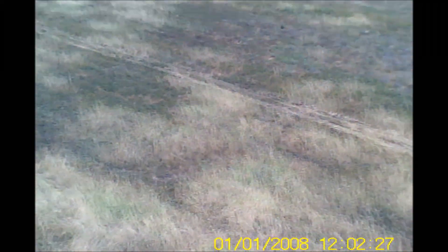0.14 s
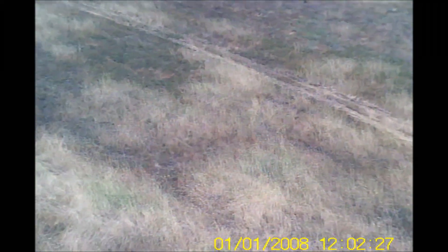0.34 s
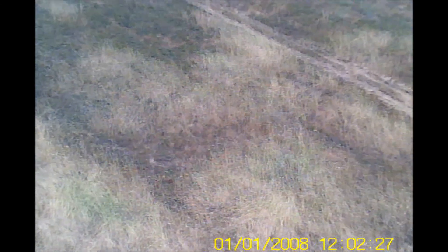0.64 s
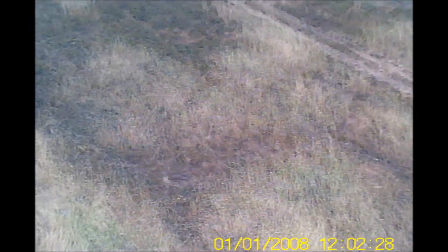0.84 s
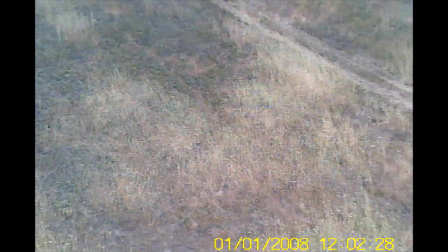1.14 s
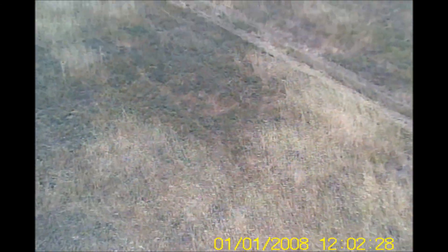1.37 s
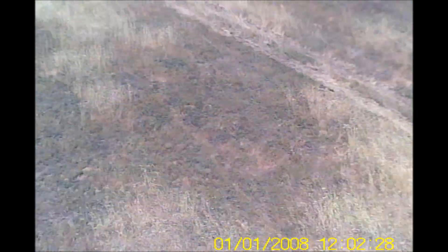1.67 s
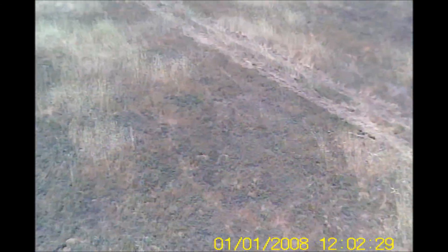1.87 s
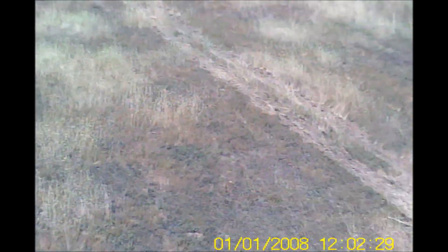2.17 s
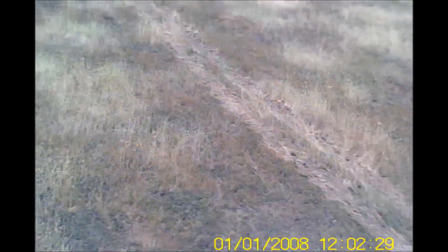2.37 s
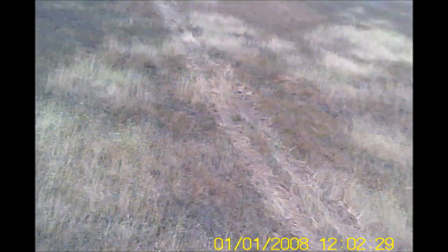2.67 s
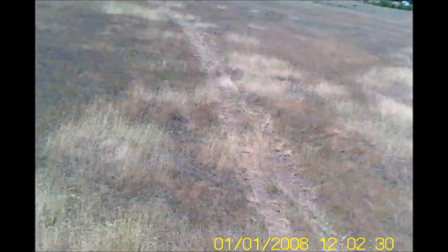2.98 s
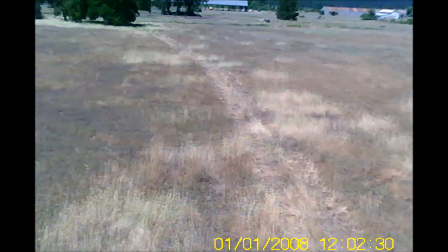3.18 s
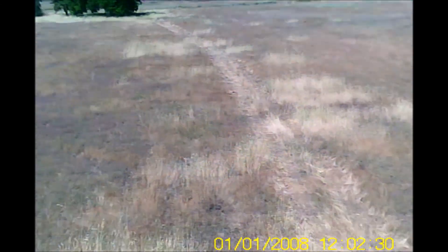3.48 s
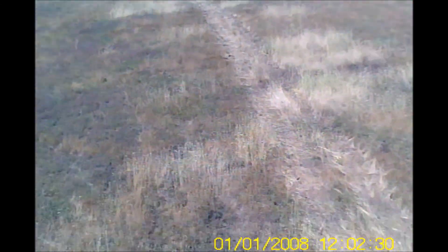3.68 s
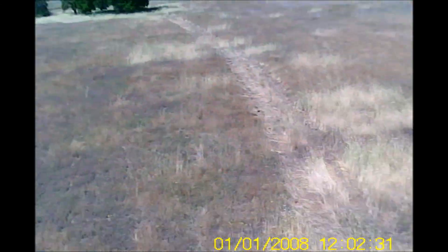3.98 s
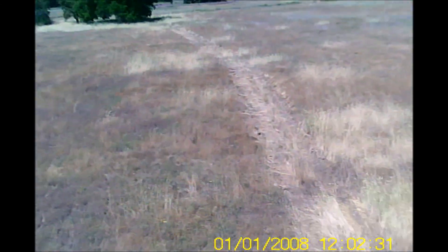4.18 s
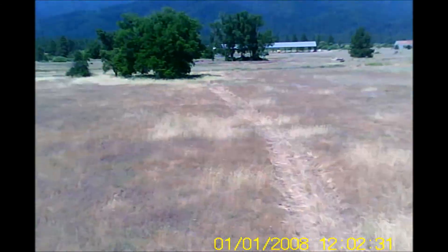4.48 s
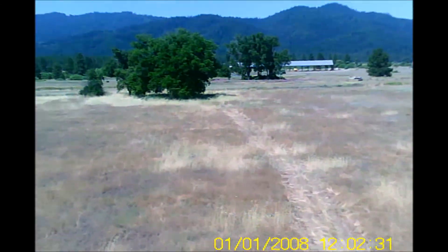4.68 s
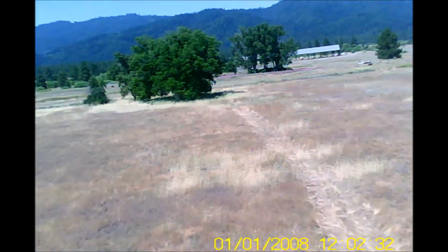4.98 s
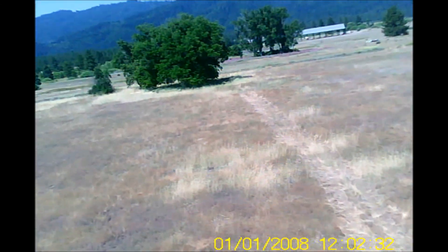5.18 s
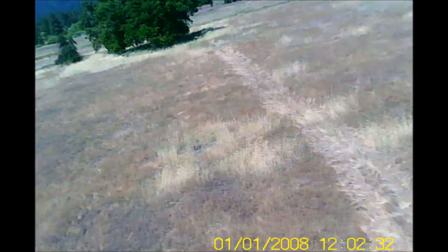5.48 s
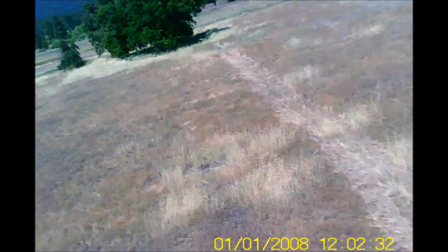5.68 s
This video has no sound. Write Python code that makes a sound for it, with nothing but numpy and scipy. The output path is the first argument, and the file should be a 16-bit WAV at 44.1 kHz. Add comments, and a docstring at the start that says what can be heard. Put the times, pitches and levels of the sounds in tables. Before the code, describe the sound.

Close, mono, slightly dull onboard sound outdoors, dry and without echo. The steady fluttering drone of a toy-sized helicopter rotor runs throughout, wavering only slightly in pitch, with thin gear lines and pulsing hiss. Wind rushes unevenly, brighter from about one second with sliding, throbbing whistles. Later it turns rougher, with low thuds, short puffs and brief whistling, then becomes a little quieter but still gusty to the cut-off.

```python
"""A microphone rides on a small electric model helicopter flying low over a field.
From the start two blades thump past at twice the rotor speed, over motor and gear lines locked to the rotor,
gear hiss and lumpy, rushing wind. Puffs and short whistles open; longer whistles glide from 1 s to 1.9 s.
From 3.5 s gusts thump and puff at the microphone port and whistles return; near 4.45 s the level steps down.
A last whistle comes at 5.5 s. Pulses and lines are cosines of rotor angle; air and hiss are shaped noise."""
import sys
import numpy as np
from scipy import signal
from scipy.fft import rfft, irfft, next_fast_len
from scipy.io import wavfile
from scipy.ndimage import uniform_filter1d

SR = 44100
rng = np.random.default_rng(int(sys.argv[2]) if len(sys.argv) > 2 else 0)


def transcribe(signal):
    """Save signal, clipped to [-1, 1], as a 16-bit WAV file at the path in sys.argv[1]."""
    frames = np.atleast_2d(signal).T
    limited = np.clip(frames, -1, 1)
    pcm = np.round(limited * 32767).astype(np.int16)
    wavfile.write(sys.argv[1], SR, pcm)


N = 257086


def from_db(db):
    """Amplitude ratio of a level in dB."""
    return 10 ** (np.asarray(db) / 20)


def rms_one(x):
    """Scale to rms 1."""
    return x / np.sqrt(np.mean(x ** 2) + 1e-20)


def in_time(rows):
    """Every column after the first, interpolated to one value per sample."""
    time_s, *columns = np.transpose(rows)
    return [np.interp(np.arange(N) / SR, time_s, column) for column in columns]


def at_hz(points, hz):
    """Spectrum level in dB, interpolated over log frequency."""
    points_hz, points_db = np.transpose(points)
    return np.interp(np.log(hz), np.log(points_hz), points_db)


def drift(rate_hz):
    """Noise at every 40th sample through a double one-pole low-pass, run in; spread 1."""
    r = np.exp(-2 * np.pi * rate_hz * 40 / SR)
    white = rng.standard_normal(N // 40 + 2002)
    slow = signal.lfilter([1], [1, -2 * r, r * r], white)[2000:]
    return np.interp(np.arange(N) / 40, np.arange(len(slow)), rms_one(slow))


def flicker(rate_hz):
    """The quick part of a drift, its 1/16 s running mean removed; spread 1."""
    slow = drift(rate_hz)
    return rms_one(slow - uniform_filter1d(slow, size=SR // 16))


def coloured(spectrum):
    """Steady noise of a given spectrum; rms 1."""
    size = next_fast_len(N)
    hz = np.maximum(np.arange(size // 2 + 1) * SR / size, 1)
    shaped = rfft(rng.standard_normal(size)) * from_db(at_hz(spectrum, hz))
    return rms_one(irfft(shaped, size)[:N])


# rotor speed: (time [s], speed [turns/s])
ROTOR_SPEED = [(0.0, 50.61), (0.2, 50.78), (1.0, 51.02), (2.0, 50.31), (2.4, 49.96), (2.75, 49.80),
               (3.2, 49.90), (3.8, 50.15), (4.0, 50.31), (4.4, 49.88), (4.8, 49.62), (5.05, 49.76),
               (5.6, 50.6), (5.83, 50.65)]


def rotor_turns():
    """Rotor angle in turns: the running sum of its speed."""
    start_turns = 0.22
    return np.cumsum(in_time(ROTOR_SPEED)[0]) / SR + start_turns


# blade pressure pulse: (time [s], blade-rate level [dB], step per overtone [dB], once-a-turn imbalance [dB])
BLADE_PULSE = [(0.0, -40, -10, -18), (0.37, -37.5, -11.5, -19), (0.5, -41.5, -10, -3),
               (0.62, -39.5, -11.5, -20), (0.8, -40.5, -11.5, -30), (1.05, -38, -10.5, -11),
               (1.91, -36.5, -8.5, -8), (2.18, -34.5, -8, -14), (2.9, -33, -8, -15), (3.02, -37, -8.5, -13),
               (3.52, -36, -7, -13), (3.64, -42, -7, -25), (3.78, -41.5, -6.5, -8), (3.87, -38, -8, -2),
               (4.12, -36, -7, -6), (4.22, -34.5, -6.5, -10), (4.44, -32.5, -8.5, -3),
               (4.53, -36.5, -6, -15), (4.64, -30.5, -10, -16), (4.85, -37.5, -6.5, -11),
               (5.24, -38, -8, -3), (5.36, -43, -7.5, -11), (5.55, -44.5, -6.5, -6), (5.68, -41.5, -10, -6),
               (5.83, -35, -14, -16)]
PULSE_SKEW_RAD = 0.47   # leans each pulse


def blades(turns):
    """A peaked pulse per blade; rougher air shakes its timing and each overtone's strength more."""
    level_db, step_db, imbalance_db = in_time(BLADE_PULSE)
    buffet_db = in_time(WIND_AT_PORT)[0]
    rough = np.clip(from_db(1.1 * (buffet_db - level_db + 12.0)), .5, 3)
    angle = 2 * np.pi * (turns + 0.0049 * np.sqrt(rough) * drift(37))
    pulses = 0
    for k, extra_db in enumerate([1, 0, 2, -4.0, -3.5]):
        sharpness_db = k * (step_db + 0.78 * drift(3.7))
        gain = from_db(sharpness_db + extra_db + 0.71 * rough * drift(16.2))
        pulses = pulses + gain * np.cos(2 * (k + 1) * angle - k * PULSE_SKEW_RAD)
    # one blade bites harder: strong and weak pulses alternate
    imbalance = from_db(imbalance_db) * (np.cos(angle + 0.088) + 0.49 * np.cos(3 * angle - .1))
    return np.sqrt(2) * from_db(level_db) * (pulses + imbalance)


def around_turn(swells, turns):
    """Gain from gear run-out: one swell once a turn, one twice a turn."""
    gain_db = 0
    for k, (depth_db, at_turns) in enumerate(swells):
        gain_db = gain_db + depth_db * np.cos(2 * np.pi * (k + 1) * (turns - at_turns))
    return from_db(gain_db)


# motor shaft 12.5, tail drive 105, main gear 150 teeth: (multiple of rotor speed [-], level [dB rms])
GEAR_LINES = [(12.5, -66.9), (13.5, -76.2), (25, -74.9), (38.5, -78.8), (75, -71.6), (100, -80.8),
              (104, -80.6), (105, -71.3), (106, -75.0), (107, -73.6), (108, -78.2), (112.5, -82.9),
              (113.5, -85.5), (123, -98.7), (124, -81.5), (125, -78.2), (126, -86.4), (128, -89.4),
              (135.5, -85.8), (136.5, -79.4), (137.5, -76.8), (143, -83.2), (149, -81.7), (150, -69.3),
              (151, -76.7), (152, -72.5), (153, -77.3), (154, -78.5), (157, -78.3), (162.5, -76.6)]
# hiss of the meshing teeth through the frame: (frequency [Hz], density [dB per Hz])
TOOTH_HISS = [(450, -16), (800, -15), (1700, -9), (3600, -8), (4500, -7), (5300, -0.5), (6000, -12.5),
              (6700, -10.5), (7700, -2.5), (8500, -4.5), (9300, -10.5), (10400, -8), (11400, -8.5)]
# run-out swells above and below the split, rows once and twice a turn: (depth [dB], angle [turns])
UPPER_SWELLS = [(1.76, 0.73), (1.92, .005)]
LOWER_SWELLS = [(1.5, 0.037), (1, 0.093)]
HISS_DB, HISS_SPLIT_HZ = -55, 6200
PEAK_OVER_RMS_DB = 3


def drive_train(turns):
    """Motor and gear lines in step, neighbours beating once a turn, over hiss that swells with run-out."""
    gear_turns = turns - .05 + 0.00038 * drift(6.4)   # lags and wavers
    lines = 0
    for multiple, level_db in GEAR_LINES:
        loose_rad = 0.74 * drift(4.6)
        gain = from_db(level_db + 1.3 * drift(2.4) + 0.85 * drift(25))
        lines = lines + gain * np.cos(2 * np.pi * multiple * gear_turns + loose_rad)
    hiss = coloured(TOOTH_HISS)
    lower = signal.sosfiltfilt(signal.butter(4, HISS_SPLIT_HZ, fs=SR, output="sos"), hiss)
    upper = hiss - lower
    hiss = lower * around_turn(LOWER_SWELLS, turns) + upper * around_turn(UPPER_SWELLS, turns)
    return from_db(HISS_DB + 0.64 * flicker(79)) * hiss + from_db(PEAK_OVER_RMS_DB) * lines


# wind at the port: (time [s], buffeting [dB], rush [dB], brightness [dB per octave])
WIND_AT_PORT = [(0.0, -52, -56, -8), (0.06, -47, -58, 6), (0.13, -48, -65, 7.5), (0.17, -48.5, -60, -1),
                (0.9, -48, -61, -1), (1.2, -49, -54.5, 4.5), (1.38, -49.5, -49.5, 3.5),
                (1.7, -48.5, -51, 3.5), (2.25, -47, -51, 2.5), (2.74, -46, -54, 2), (2.86, -45, -50, 2.5),
                (2.96, -48, -51, 1.5), (3.03, -46, -54, 1.5), (3.5, -46, -52, 0), (3.57, -44, -47, -0.5),
                (3.68, -38.5, -49, 4.5), (3.87, -38, -47, -1), (4.2, -42.5, -50, 0), (4.5, -38, -51, -2),
                (5.0, -38, -49, -3.5), (5.15, -43.5, -50, -3), (5.31, -34, -48, 0), (5.56, -42.5, -50, 0),
                (5.83, -39.5, -50.5, -1)]
# spectra: (frequency [Hz], density [dB per Hz])
BUFFET_SPECTRUM = [(18, -6), (28, 0.5), (40, -16), (58, -6), (80, -8), (140, -16.5), (260, -19.5),
                   (450, -27.5), (800, -54.5)]
RUSH_SPECTRUM = [(150, 5), (350, 3), (700, 1), (1300, -3), (2200, -9), (3500, -17.5), (5000, -23.5),
                 (8000, -51)]
GUST_SPREAD_DB, GUST_RATE_HZ = 2.5, 4.2   # slow lumps in the buffeting
FLICKER_DB_PER_DB = 0.38   # flicker depth rises 0.38 dB per dB of buffeting


def wind(turns):
    """Lumpy low buffeting; a rush in half-octave bands that flicker partly together, throbbing with downwash."""
    buffet_db, rush_db, bright_db = in_time(WIND_AT_PORT)
    lumps_db = GUST_SPREAD_DB * drift(GUST_RATE_HZ) + 2.0 * drift(16)
    buffet = from_db(buffet_db + lumps_db) * coloured(BUFFET_SPECTRUM)

    together = from_db(FLICKER_DB_PER_DB * (buffet_db - buffet_db.mean())) * flicker(50)
    edges_hz = 150 * 2 ** np.arange(0, 5.6, .5)
    sources = [coloured(RUSH_SPECTRUM), coloured(RUSH_SPECTRUM)]   # neighbouring bands use different noise
    rush = 0
    for k, (low_hz, high_hz) in enumerate(zip(edges_hz, edges_hz[1:])):
        band_filter = signal.butter(2, [low_hz, high_hz], "band", fs=SR, output="sos")
        band = signal.sosfilt(band_filter, sources[k % 2])
        tilt_db = bright_db * np.log2(low_hz / 700)
        flicker_db = 1.29 * together + 0.4 * flicker(30) + 0.9 * drift(9.4)
        rush = rush + band * from_db(tilt_db + flicker_db)
    throb_db = 1.8 * np.cos(4 * np.pi * turns - .8)
    return buffet + from_db(rush_db + throb_db) * rush


# air across an edge: (start [s], length [s], first pitch [Hz], last pitch [Hz], first level [dB],
# last level [dB], pitch spread [Hz], throb [dB])
EDGE_WHISTLES = [(.051, .029, 3750, 3400, -57, -55, 120, 2), (.088, .036, 3450, 3550, -59, -56, 150, 5),
                 (.13, .012, 3100, 3050, -61, -61, 200, 3), (.99, .08, 3600, 3300, -56, -63, 140, 8),
                 (1.075, .455, 3520, 4050, -55, -57, 85, 5), (1.18, .67, 1830, 2400, -58.5, -63, 110, 5),
                 (1.33, .14, 3050, 2980, -63, -62, 120, 4), (1.6, .07, 3150, 3200, -63, -66, 130, 4),
                 (3.6, .3, 2200, 2100, -58, -65, 300, 3), (3.61, .23, 3450, 3480, -64, -66, 600, 4),
                 (5.47, .23, 2050, 2000, -58.5, -59, 250, 3)]
FADE_SHARE = 0.026   # share of the length spent rising, and again dying
PITCH_SHAKE_RATE_HZ, PITCH_SWING_HZ = 350, 45


def whistles(turns):
    """Rough tones of shaking pitch that glide evenly, pulsed once a turn by the rotor's wake."""
    out, time_s = 0, np.arange(N) / SR
    wake_angle = 2 * np.pi * turns - 2.4
    swing_hz = -PITCH_SWING_HZ * np.sin(wake_angle)   # sags through each throb
    for start_s, length_s, first_hz, last_hz, first_db, last_db, spread_hz, throb_db in EDGE_WHISTLES:
        along = np.clip((time_s - start_s) / length_s, 0, 1)
        glide_hz = first_hz + (last_hz - first_hz) * along
        pitch_hz = glide_hz + swing_hz + spread_hz * drift(PITCH_SHAKE_RATE_HZ)
        angle = 2 * np.pi * np.cumsum(pitch_hz) / SR
        pulse_db = throb_db * (np.cos(wake_angle) - .3)
        rough_db = 1.2 * drift(11) + 2.8 * flicker(60)
        level_db = first_db + (last_db - first_db) * along + pulse_db + rough_db
        fade = np.clip(np.minimum(along, 1 - along) / FADE_SHARE, 0, 1)
        out = out + fade * from_db(level_db) * np.cos(angle)
    return np.sqrt(2) * out


# short puffs of air on the port: (onset [s], relative strength [dB])
AIR_PUFFS = [(0.052, -40.5), (0.07, -42), (0.09, -41), (0.116, -40.5), (0.134, -43), (2.845, -41),
             (2.945, -38.5), (3.65, -36), (3.69, -38), (4.227, -40), (4.277, -44), (4.392, -43),
             (4.431, -38), (4.499, -41), (4.615, -39), (4.71, -44), (4.776, -45), (4.965, -32),
             (5.011, -38), (5.068, -49), (5.253, -35), (5.325, -39), (5.37, -42), (5.5, -40),
             (5.562, -36.5)]
# (frequency [Hz], density [dB per Hz])
PUFF_SPECTRUM = [(200, -17), (600, 9), (1500, 3.5), (3500, -9), (6000, -39), (9000, -60)]
PUFF_LENGTH_S, PUFF_GAIN_DB = 0.0057, -5.5


def puffs():
    """Each puff is a few milliseconds of dull noise that swells and dies."""
    clicks = np.zeros(N)
    for onset_s, strength_db in AIR_PUFFS:
        clicks[round(onset_s * SR)] = from_db(strength_db + PUFF_GAIN_DB)
    swell = np.hanning(round(PUFF_LENGTH_S * SR))
    return np.convolve(clicks, swell)[:N] * coloured(PUFF_SPECTRUM)


# single gust thumps on the port: (onset [s], strength before damping [dB])
GUST_THUMPS = [(3.573, -23), (3.653, -21), (3.834, -21.5), (3.94, -18), (4.009, -34), (4.442, -26),
               (4.924, -36), (5.034, -29), (5.384, -22.5), (5.456, -25.5)]
THUMP_HZ, THUMP_DECAY_S = 42, .09   # decay by 60 dB


def thumps():
    """A gust pushes the diaphragm in and it swings back: a heavily damped resonance."""
    clicks = np.zeros(N)
    for onset_s, strength_db in GUST_THUMPS:
        clicks[round(onset_s * SR)] = -from_db(strength_db)
    r = from_db(-60 / (THUMP_DECAY_S * SR))
    w = 2 * np.pi * THUMP_HZ / SR
    return signal.lfilter([0, np.sin(w)], [1, -2 * r * np.cos(w), r * r], clicks + 1e-18)


def scene():
    """Sum of all sources, sharing one rotor angle."""
    turns = rotor_turns()
    machine = blades(turns) + drive_train(turns)
    air = wind(turns) + whistles(turns) + puffs() + thumps()
    return (machine + air)[None]


# level of the whole sound: (time [s], level [dB])
OVERALL_LEVEL = [(0, 0.5), (4.28, 0), (4.45, -2), (4.47, -5), (5.83, -4.5)]
ROLL_OFF_HZ, CUTOFF_HZ = 10450, 11300


def record(dry):
    """The level sags and steps down once; the top rolls off, then is cut."""
    levelled = from_db(in_time(OVERALL_LEVEL)[0]) * dry
    dull = signal.sosfilt(signal.butter(24, ROLL_OFF_HZ, fs=SR, output="sos"), levelled)
    return signal.sosfilt(signal.ellip(10, .5, 60, CUTOFF_HZ, fs=SR, output="sos"), dull)


dry = scene()
out = record(dry)
transcribe(out)
```